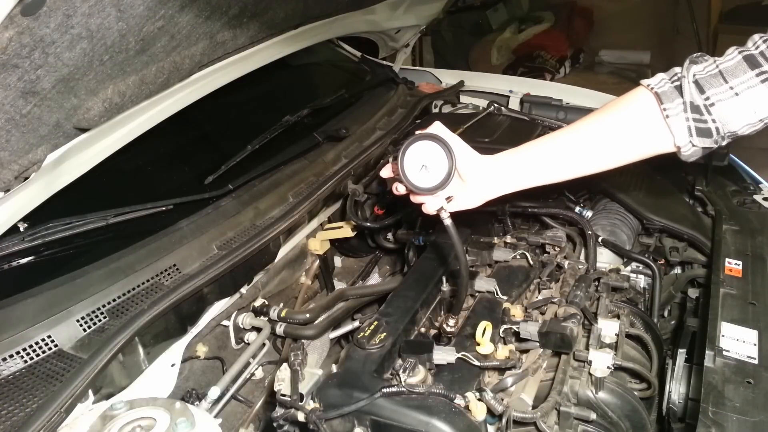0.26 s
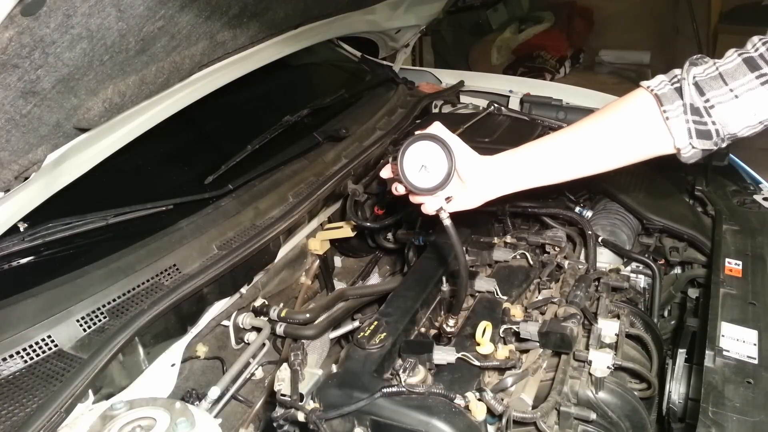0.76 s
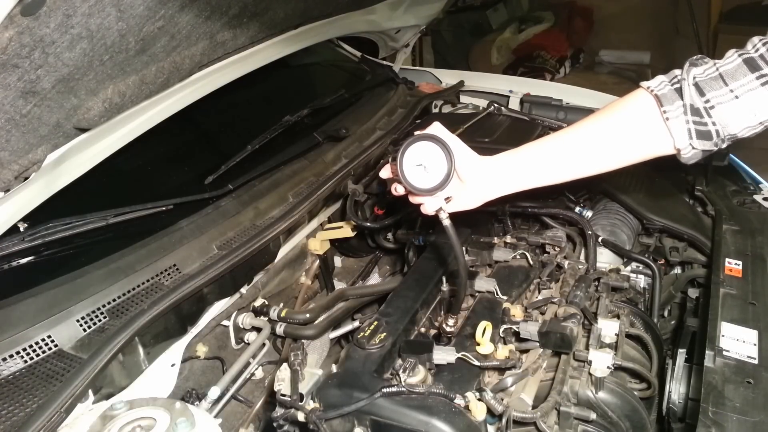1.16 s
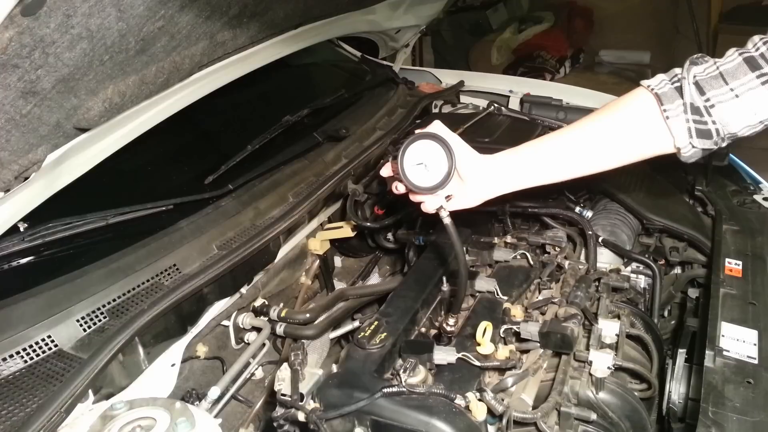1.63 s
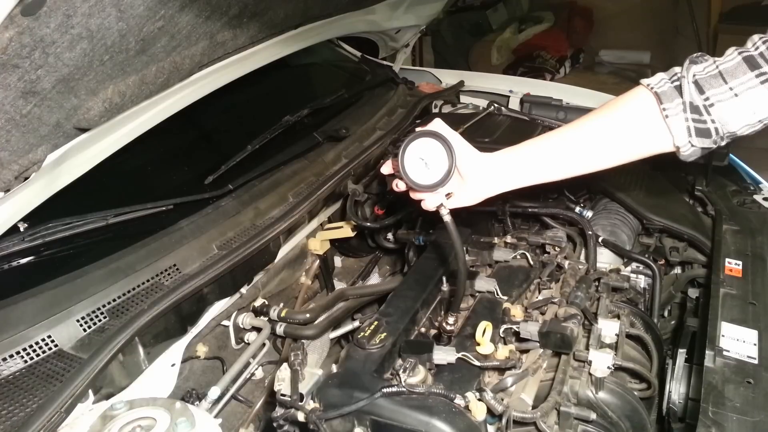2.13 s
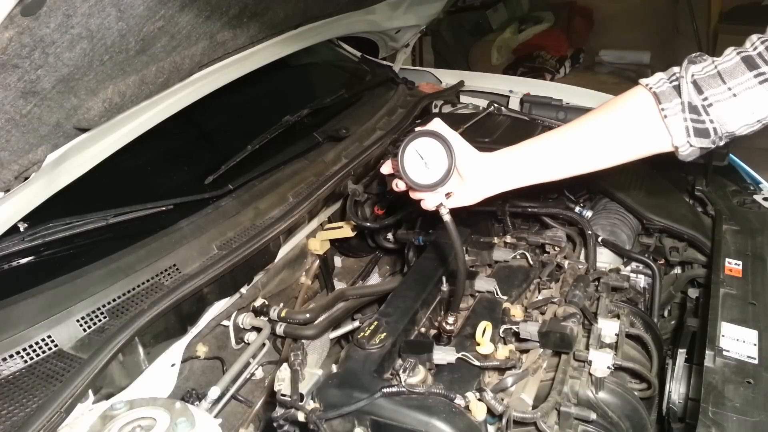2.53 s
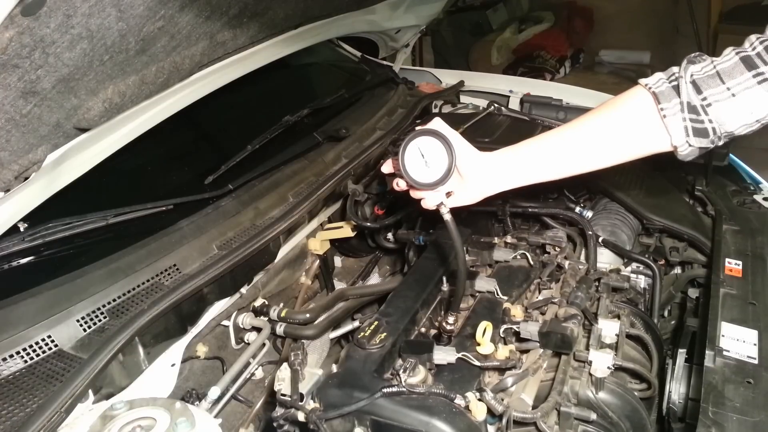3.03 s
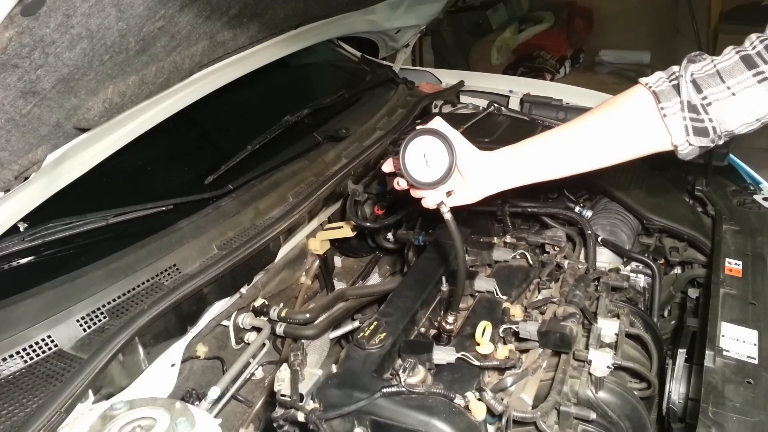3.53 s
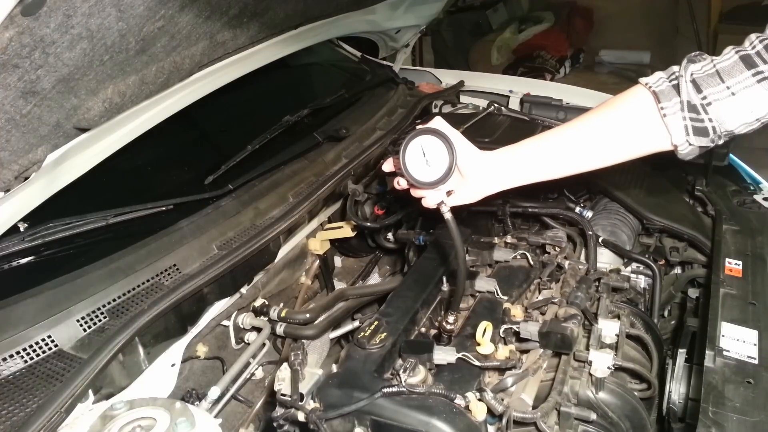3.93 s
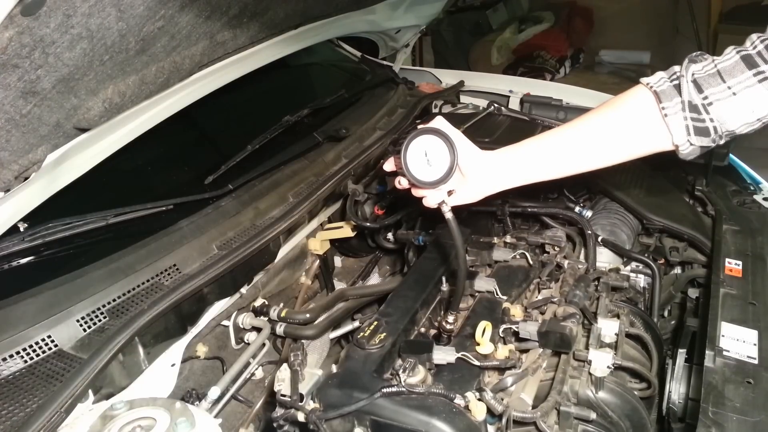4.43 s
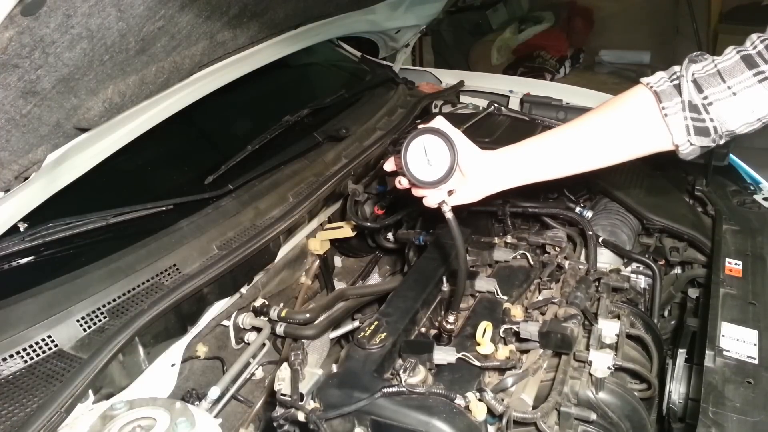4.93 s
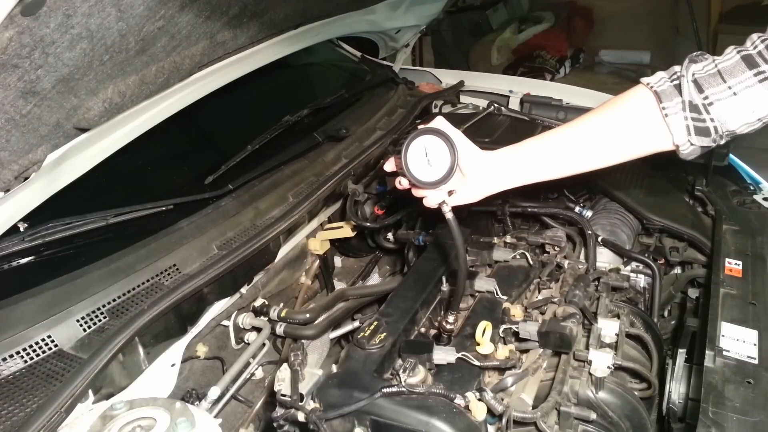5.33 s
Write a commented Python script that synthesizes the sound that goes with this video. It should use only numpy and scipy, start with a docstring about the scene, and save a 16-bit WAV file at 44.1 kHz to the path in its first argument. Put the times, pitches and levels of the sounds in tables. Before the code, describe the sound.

In a garage, a car engine cranks steadily on its whirring starter, knocking and rattling about nine times a second, never catching.

```python
"""A four-cylinder engine is cranked on its starter for a compression test, bonnet open, in a garage.
First the fuel pump, noise through resonances, primes and stops, while the throttle motor's sines sing faintly on.
Then the pinion slams in, as bursts of filtered noise, and the starter whirs and whines as it spins the engine up.
From then on, about nine times a second, a compression stroke loads the gears: decaying block modes knock,
partials of the tooth rate groan, and noise gated tooth by tooth rattles over the whir."""
import sys
import numpy as np
from scipy import signal
from scipy.fft import rfft, irfft
from scipy.io import wavfile
from scipy.ndimage import uniform_filter1d, minimum_filter1d

SR = 44100
rng = np.random.default_rng(int(sys.argv[2]) if len(sys.argv) > 2 else 0)


def digitize_waveform(pressure):
    """Quantize a signal to 16-bit integers and store it at the path in sys.argv[1].

    Rows of a 2-D input are taken as channels; values are limited to [-1, 1].
    """
    field = np.atleast_2d(pressure).T
    bounded = np.clip(field, -1, 1)
    quanta = np.round(bounded * 32767).astype(np.int16)
    wavfile.write(sys.argv[1], SR, quanta)


N = 245637
TIME = np.arange(N) / SR
BINS = np.fft.rfftfreq(N, 1 / SR)
CRASH_DECAY = .012  # s, first clash of the teeth


def gain_of(db):
    """Level law: decibels to an amplitude ratio."""
    return 10 ** (np.asarray(db) / 20)


def evened(x):
    """Normalisation: scales to an rms of 1."""
    return x / np.sqrt(np.mean(x ** 2) + 1e-20)


def read(points, hz):
    """Spectral envelope: interpolates a table on a log-frequency axis."""
    f, value = np.transpose(points)
    return np.interp(np.log(hz + 1), np.log(f + 1), value)


def curve(rows):
    """Temporal envelope: interpolates a time table at every sample."""
    times, values = np.transpose(rows)
    return np.interp(TIME, times, values)


def add(mix, s, sound):
    """Superposition: mixes a sound in at time s."""
    part = mix[round(s * SR):][:len(sound)]
    part += sound[:len(part)]


def swell(t, rise):
    """Gradual onset: a smooth step from 0 to 1."""
    return np.sin(np.pi / 2 * np.clip(t / rise, 0, 1)) ** 2


def wander(size, width):
    """Random modulation: smooth chance of rms 1 that changes over about width points."""
    rough = uniform_filter1d(rng.standard_normal(size), width)
    return evened(uniform_filter1d(rough, width))


# Correlation of the noise in the two channels: (frequency [Hz], likeness [-1..1])
CHANNEL_LIKENESS = [(50, 0), (150, 0.9), (700, 0.5), (1150, 0.16), (1800, 0.23), (2600, 0), (14000, 0)]


def hiss(colour, peaks=(), gate=1, ripple_db=0):
    """Source-filter principle: gated noise excites a resonant body, partly alike in the two channels."""
    a, b = rfft(rng.standard_normal((2, N)) * gate)
    same = np.clip(read(CHANNEL_LIKENESS, BINS), -1, 1)
    pair = np.array([a, same * a + np.sqrt(1 - same ** 2) * b])
    db = read(colour, BINS)
    for hz, width, peak_db in peaks:
        db = db + peak_db / (1 + ((BINS - hz) * 2 / width) ** 2)
    db = db + ripple_db * wander(len(BINS), width=170) * swell(BINS, 1300)  # countless small modes
    # minimum phase: the body rings after each blow, not before
    cepstrum = irfft(np.log(evened(gain_of(db))), N) * (1 + np.sign(N / 2 - np.arange(N)))
    cepstrum[0] /= 2
    return irfft(pair * np.exp(rfft(cepstrum)), N)


# Spectrum of the still garage: (frequency [Hz], relative level [dB])
AIR_COLOUR = [(25, -35), (55, -8), (100, -23), (148, -0.5), (190, -8), (280, -2), (420, -2), (530, 1),
              (780, -4.5), (1050, -8.5), (1700, -19.5), (2600, -25.5), (6000, -33), (14000, -31.5)]


def garage_air(level_db=-41.5):
    """Broadband noise: the garage's own murmur of air, drifting slightly in level."""
    drift_db = curve([(0, -0.5), (.75, 0), (1, -2.5)])
    return gain_of(level_db + drift_db) * hiss(AIR_COLOUR)


# Reverberation time of the garage: (frequency [Hz], t60 [s])
GARAGE_T60 = [(150, 0.3), (1000, 0.26), (4000, 0.74), (12000, 0.43)]


def garage(x, gap=0.0042):
    """Reverberation: sparse reflections off bonnet and walls, each band dying at its own speed."""
    count = SR // 2
    signs = rng.choice([-1., 1.], (2, count))
    taps = signs * (rng.random((2, count)) < .05) * (TIME[:count] > gap)
    hz, t, z = signal.stft(taps, SR, nperseg=256)
    decay_db = -60 * t / read(GARAGE_T60, hz)[:, None]
    tail = signal.istft(z * gain_of(decay_db), SR, nperseg=256)[1]
    return signal.fftconvolve(x[None], tail / np.linalg.norm(tail[0]), axes=1)[:, :N]


# Odd partials of the throttle motor's drive: (frequency [Hz], rms level [dB])
THROTTLE_PARTIALS = [(2400, -71), (4000, -68.5), (8800, -85)]


def throttle_motor():
    """Additive synthesis: steady odd partials of the motor's drive."""
    return sum(gain_of(db) * np.sqrt(2) * np.sin(2 * np.pi * hz * TIME) for hz, db in THROTTLE_PARTIALS)


# Fuel rushing through the rail: (frequency [Hz], relative level [dB])
PUMP_COLOUR = [(150, -37), (500, -9), (1400, -5), (2300, -3.5), (3000, -7), (4400, -9), (5130, -15.5),
               (5400, -26), (7200, -22), (8200, -50), (14000, -51)]
# Its resonances: (frequency [Hz], width [Hz], height [dB])
PUMP_RESONANCES = [(2280, 81, 8.8), (2630, 70, 7.4), (3700, 62, 3.7), (4080, 41, 9.7), (4600, 30, 13),
                   (4900, 45, 4.9), (5100, 67, 10)]


def fuel_pump(level_db=-39.5, stop_s=.61, fall_db_per_s=251):
    """Flow noise: fuel rushes through a resonant rail, then dies away exponentially once the pump cuts out."""
    fall_db = fall_db_per_s * np.maximum(TIME - stop_s, 0)
    return gain_of(level_db - fall_db) * hiss(PUMP_COLOUR, PUMP_RESONANCES)


# Solenoid throwing the pinion in: (time [s], level [dB], decay [s])
PINION_BLOWS = [(1.081, -3.5, 0.012), (1.107, -9.5, 0.059)]
# Spectrum of those blows: (frequency [Hz], relative level [dB])
BLOW_COLOUR = [(59, -50), (100, -21), (360, -11), (443, -18), (670, -3), (841, 2), (1120, -21), (1250, -4),
               (1700, 3), (2180, -6), (4310, 3), (5410, -11), (14000, -27.5)]


def solenoid():
    """Impact excitation: the pinion hits the ring gear, then the motor snatches it."""
    t, blows = np.arange(SR // 4) / SR, np.zeros(N)
    for s, db, decay in PINION_BLOWS:
        add(blows, s, gain_of(db) * swell(t, 0.0027) * np.exp(-t / decay))
    slide = gain_of(curve([(1.05, -92), (1.066, -31), (1.08, -20), (1.09, -107)]))  # the plunger's travel
    return hiss(BLOW_COLOUR, gate=blows + slide, ripple_db=2.5)


# Brushes and reduction gears of the starter: (frequency [Hz], relative level [dB])
WHIR_COLOUR = [(40, -37), (90, -20), (145, -7), (250, -12.5), (390, 5.5), (600, 3), (1500, -3.5),
               (1950, -5), (3000, 1), (4400, -2.5), (5300, -7.5), (7500, -14.5), (10500, -23.5),
               (14500, -57)]
# Their resonances: (frequency [Hz], width [Hz], height [dB])
WHIR_RESONANCES = [(1110, 70, 7), (1590, 60, 6), (1715, 50, 7), (2750, 170, 6), (4230, 60, 3),
                   (7870, 40, 8), (9500, 500, 4)]
# Mean level of the whir, about which it flutters: (time [s], level [dB])
WHIR_LEVEL = [(1.07, -90), (1.11, -17.5), (1.2, -23), (1.29, -23), (1.48, -21.5), (5.57, -21)]


def starter(flutter_db=2.0):
    """Friction noise: the motor's own whir, which carries on between the strokes."""
    flutter = evened(uniform_filter1d(rng.standard_normal(N), 150))
    level = gain_of(curve(WHIR_LEVEL) + flutter_db * flutter) * swell(TIME[-1] - TIME, 0.021)
    return hiss(WHIR_COLOUR, WHIR_RESONANCES, level, ripple_db=1.5)


def stroke_times(count=36, first_s=1.499, strokes_per_s=8.743, creep_per_s=.0083,
                 sluggish_per_s=.706, settle_strokes=3.36):
    """Rotational inertia: the crank catches up exponentially, then creeps faster; a compression each half turn."""
    n = np.arange(count - 1)
    # the creep is gained with each stroke; the shortfall fades over about settle_strokes
    rate = strokes_per_s + creep_per_s * n - sluggish_per_s * np.exp(-n / settle_strokes)
    return first_s + np.append(0, np.cumsum(1 / rate))


# The cylinders in firing order, relative levels: (knock [dB], groan [dB], low pulse [dB])
CYLINDER_LEVELS = [(1, -14.5, -37), (3, -12.5, -37), (3.5, -16, -34), (2.8, -12.5, -29)]


def strokes():
    """Periodic excitation: the cylinders take turns, giving rows of (s, knock dB, groan dB, low pulse dB)."""
    return [(s, *CYLINDER_LEVELS[n % len(CYLINDER_LEVELS)]) for n, s in enumerate(stroke_times())]


# Loads while the engine gets moving (snatch, spin-up, first compression):
# (time [s], rise [s], hold [s], decay [s], relative groan level [dB], relative rattle level [dB])
EARLY_LOADS = [(1.081, 0.019, .004, 0.032, -30.5, -18.5), (1.14, 0.064, 0.017, 0.024, -27.5, -24),
               (1.3, 0.0069, 0.077, 0.041, -14, -19)]


def slow_load():
    """Load envelope: strength of groan and of rattle as each early load rises, holds and dies away."""
    total = np.zeros((2, N))
    for s, rise, hold, decay, groan_db, rattle_db in EARLY_LOADS:
        fall = np.exp(-np.maximum(TIME - s - rise - hold, 0) / decay)
        total += gain_of([[groan_db], [rattle_db]]) * swell(TIME - s, rise) * fall
    return total


def tooth_tone(hz, partials, rough, scatter_db):
    """Gear-mesh tone: partials of a tooth rate; uneven teeth make each one slip in phase and size."""
    angle = 2 * np.pi * np.cumsum(hz) / SR
    slip = rough * wander(len(hz), width=170)
    tone = np.zeros(len(hz))
    for k, db in partials:
        level = gain_of(db + scatter_db * wander(len(hz), width=300))
        tone += level * np.sin(k * (angle + slip))
    return evened(tone)


# Rate at which pinion teeth meet the ring gear under load: (time [s], rate [Hz])
TOOTH_RATE = [(1.08, 170), (1.18, 242), (1.285, 270), (1.305, 358), (1.34, 350), (1.38, 312), (1.44, 295),
              (1.495, 363), (1.62, 408), (2.3, 412), (5.57, 421)]
# Partials of the commutator rate: (multiple [1], relative level [dB])
COMMUTATOR_PARTIALS = [(.18, -7), (.43, -1), (.68, -4), (1, -6), (1.5, -19), (2, -15)]


def whine(slowest=0.22, swing=.045, bars_per_tooth=15.05, level_db=-31.5, db_per_octave=30):
    """Frequency modulation: every stroke drags the geared armature down and it speeds up before the next."""
    times, mesh = stroke_times(), curve(TOOTH_RATE)
    stroke = np.interp(TIME, times, np.arange(len(times)))
    speed = 1 - swing * np.cos(2 * np.pi * (stroke - slowest))  # swing: share of the mean speed
    growth_db = db_per_octave * np.log2(mesh / mesh[-1])
    level = gain_of(level_db + growth_db) * swell(TIME - TOOTH_RATE[0][0], .06)
    bar_hz = bars_per_tooth * mesh * speed
    tone = level * tooth_tone(bar_hz, COMMUTATOR_PARTIALS, rough=.55, scatter_db=3.5)
    return .7 * (tone + garage(tone))


def low_pulse(scatter_db=8):
    """Amplitude-gated noise: a low-frequency noise pulse at each stroke, of uneven strength."""
    gate, shape = np.zeros(N), np.hanning(int(.036 * SR))
    for s, *_, low_pulse_db in strokes():
        add(gate, s - .01, gain_of(low_pulse_db + scatter_db * rng.uniform(-1, 1)) * shape)
    return gate * hiss([(15, 3), (40, 3), (110, -5), (250, -18), (600, -60)])


# Gears chattering as the piston goes over the top: (frequency [Hz], relative level [dB])
CHATTER_COLOUR = [(60, -48.5), (115, -24), (150, -6.5), (200, -8.5), (260, -18), (450, 0.5), (580, -12),
                  (950, -8.5), (1250, -4), (1700, -14), (2000, -14.5), (3000, -5), (6000, -17),
                  (14000, -64)]
# Their resonances: (frequency [Hz], width [Hz], height [dB])
CHATTER_RESONANCES = [(1195, 26, 13), (1242, 16, 7.7), (1500, 77, 5.4), (1553, 50, 14.2), (1980, 45, 3.2),
                      (2540, 45, 9)]


def chatter(level_db=-20.3, delay=0.013, length=0.063, scatter_db=1.0, first_top=1.5, first_db=-18):
    """Load reversal: past the top the squeezed air pushes the piston on, and the unloaded teeth chatter."""
    slack, burst = np.zeros(N), np.hanning(int(length * SR))
    add(slack, first_top, gain_of(first_db) * burst)
    for s in stroke_times():
        add(slack, s + delay, gain_of(level_db + scatter_db * rng.standard_normal()) * burst)
    return hiss(CHATTER_COLOUR, CHATTER_RESONANCES, slack, ripple_db=3.5)


# Clatter of loaded teeth: (frequency [Hz], relative level [dB])
RATTLE_COLOUR = [(60, -41), (240, -24.5), (400, -6.5), (600, 0.5), (950, 2.5), (1100, 1.5), (1600, 1),
                 (2200, -2), (2900, -2.5), (4400, -2.5), (5200, -10), (7800, -17.5), (10500, -23.5),
                 (14500, -31.5)]
# Its resonances: (frequency [Hz], width [Hz], height [dB])
RATTLE_RESONANCES = [(942, 28, -7), (1290, 100, 8), (1330, 51.5, -11), (1683, 51, 8.5), (1976, 110, 6),
                     (2080, 230, -1.5), (2414, 30, 7.5), (6680, 110, 9)]


def rattle(level_db=-9.0, rise=0.011, lead=0.0072, linger_decay=0.036, bite=0.5, grain_db=2):
    """Amplitude modulation: every tooth lands with a burst of clatter, hardest as the load comes on."""
    t, load = np.arange(SR // 4) / SR, slow_load()[1]
    fall = np.exp(-np.maximum(t - rise, 0) / CRASH_DECAY) + np.exp(-t / linger_decay)
    shape = .5 * swell(t, rise) * fall
    for s in stroke_times():
        add(load, s - lead, gain_of(level_db) * shape)
    turns = np.cumsum(curve(TOOTH_RATE)) / SR  # teeth passed so far
    tooth_db = grain_db * rng.standard_normal(N)[turns.astype(int)]
    teeth = evened(gain_of(tooth_db) * np.exp(-bite * (turns % 1)))
    return gain_of(6) * hiss(RATTLE_COLOUR, RATTLE_RESONANCES, load * teeth, ripple_db=2.5)


# Ring of the block and bell housing: (frequency [Hz], relative level [dB], t60 [s])
BLOCK_MODES = [(162.7, -21, 0.31), (209.9, -22.5, 0.53), (305, -6, 0.12), (344.5, -2.5, 0.2),
               (398, -6.5, 0.077), (431.7, -4, 0.12), (472.6, 10.5, 0.07), (585, -20, .06), (668, 0, 0.22),
               (722, 3.5, 0.14), (812, -1, 0.2), (870, -21, 0.089), (1086, -10.5, 0.44), (1210, -6.5, 0.21),
               (1620, 1, 0.11), (1780, -0.5, 0.059)]


def knock(level_db=-18, rise=0.0058, scatter_db=2.5):
    """Modal synthesis: the backlash closes at each stroke and the block rings, nearly alike every time."""
    t, out = np.arange(SR // 3) / SR, np.zeros(N)
    hz, db, t60 = np.array(BLOCK_MODES).T[:, :, None]
    for s, knock_db, *_ in strokes():
        phase = rng.random(hz.shape) * swell(hz, 853)  # the low modes start in step, the high ones by chance
        modes = gain_of(db - 60 * t / t60) * np.sin(2 * np.pi * (hz * t + phase)) * swell(t, rise)
        mode_db = knock_db + level_db + scatter_db * rng.standard_normal(len(BLOCK_MODES))
        add(out, s, gain_of(mode_db) @ modes)
    return out


# Partials of the tooth rate in the slow first turn: (multiple [1], relative level [dB])
SLOW_TOOTH_PARTIALS = [(1, -13), (2, 0), (3, -27), (4, -20)]
# Partials of the tooth rate in the strokes: (multiple [1], relative level [dB])
TOOTH_PARTIALS = [(1, -8), (2, 2.2), (3, -10), (4.15, -9), (5, -20), (5.9, -19)]
# Slow drift in the groan: (time [s], level change [dB])
GROAN_LEVEL_DRIFT = [(1.5, 1), (2.2, 0.2), (3.3, 2.3), (4.3, 1), (5.5, 1)]


def groan(sag=.033, rise=.0105, linger_decay=.04, delay=-.003, level_db=7):
    """Forced vibration: teeth pressed together hum at the mesh rate, which sags as the piston compresses its air."""
    mesh, t = curve(TOOTH_RATE), np.arange(SR // 7) / SR
    out = slow_load()[0] * tooth_tone(mesh, SLOW_TOOTH_PARTIALS, rough=.21, scatter_db=2.5)
    fall = np.exp(-np.maximum(t - rise, 0) / CRASH_DECAY) + 0.032 * np.exp(-t / linger_decay)
    load = swell(t, rise) * fall
    for s, _, groan_db, _ in strokes():
        hz = mesh[round(s * SR)] * (1 - sag * swell(t, 0.048))
        tone = tooth_tone(hz, TOOTH_PARTIALS, rough=.09, scatter_db=1.3)
        add(out, s + delay, gain_of(groan_db + level_db) * load * tone)
    return out * gain_of(curve(GROAN_LEVEL_DRIFT))


# Balance of the engine between the channels: (frequency [Hz], left minus right [dB])
STEREO_BALANCE = [(800, 0), (1250, -0.5), (1550, -8), (1750, 2.5), (1950, -2.5), (2300, -0.5), (3300, 3),
                  (3750, 1), (4300, 0), (6000, -4), (9000, -6), (13000, -1)]


def scene(garage_db=-10):
    """Superposition: the cranking engine, heard from just above the bay."""
    background = garage_air() + throttle_motor() + fuel_pump()
    gears = groan() + knock()
    engine = gears + gain_of(garage_db) * garage(gears)
    engine = engine + solenoid() + starter() + whine() + low_pulse() + chatter() + rattle()
    lean_db = read(STEREO_BALANCE, BINS) / 2
    delay = np.exp(2j * np.pi * BINS * [[0], [-.00005]])  # s, the right port is a little farther
    ports = gain_of([lean_db, -lean_db]) * delay
    return irfft(rfft(engine) * ports, N) + background


def record(dry, ceiling=1.0, size=40, edge_hz=14650):
    """Peak limiting: a fast limiter holds any peaks above the ceiling; then the band limit."""
    gain = minimum_filter1d(ceiling / np.maximum(abs(dry), ceiling), size=2 * size)
    held = dry * uniform_filter1d(uniform_filter1d(gain, size), size)
    low_cut = signal.butter(1, 110, "high", fs=SR, output="sos")  # gentle
    held = signal.sosfilt(low_cut, held)
    high_cut = signal.firwin(511, edge_hz, window=("kaiser", 8), fs=SR)
    return signal.oaconvolve(held, high_cut[None], "same")


dry = scene()
out = record(dry)
digitize_waveform(out)
```